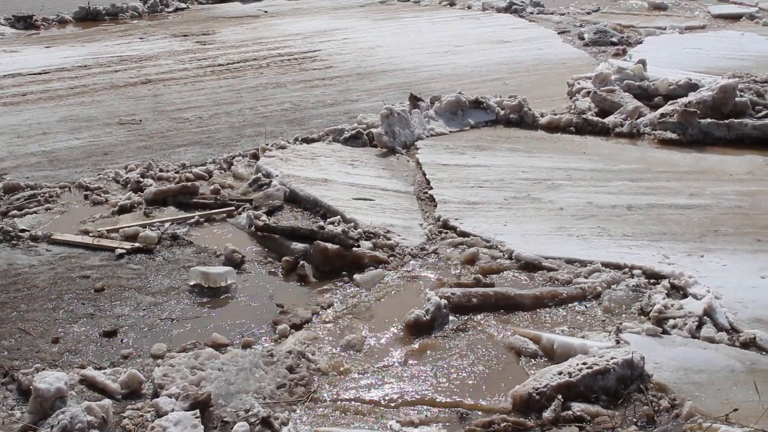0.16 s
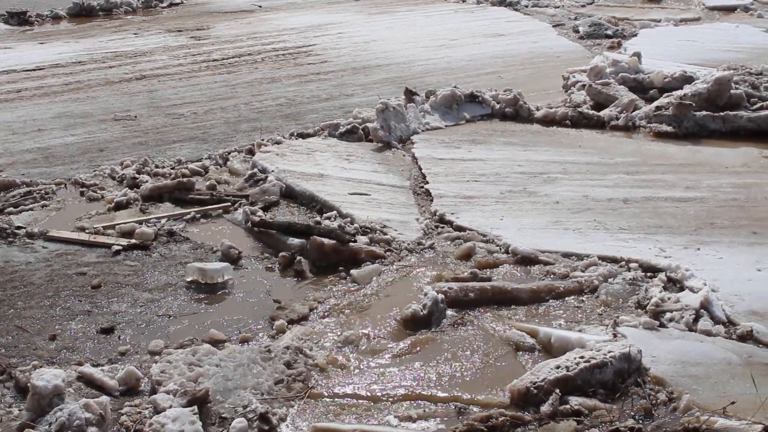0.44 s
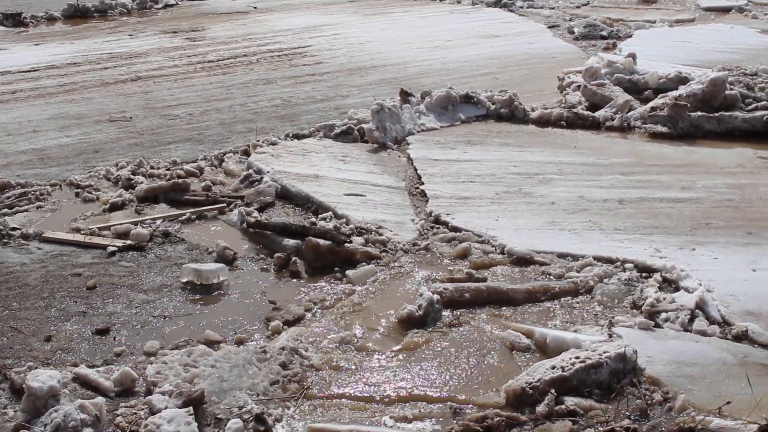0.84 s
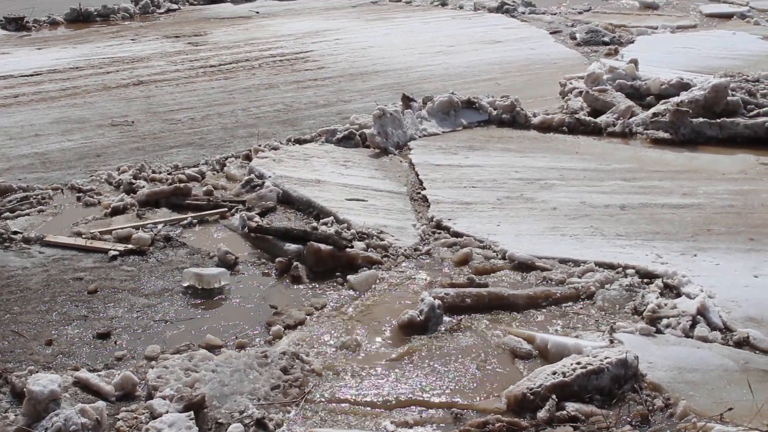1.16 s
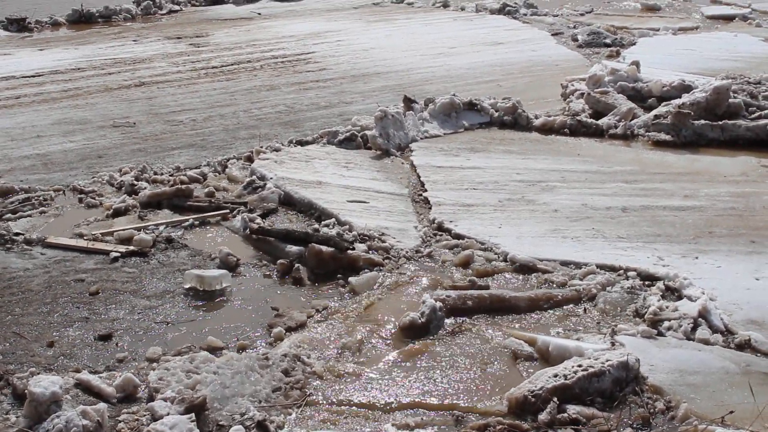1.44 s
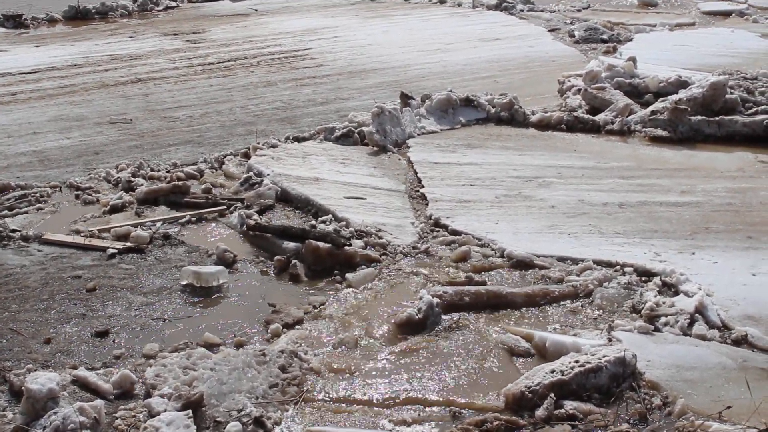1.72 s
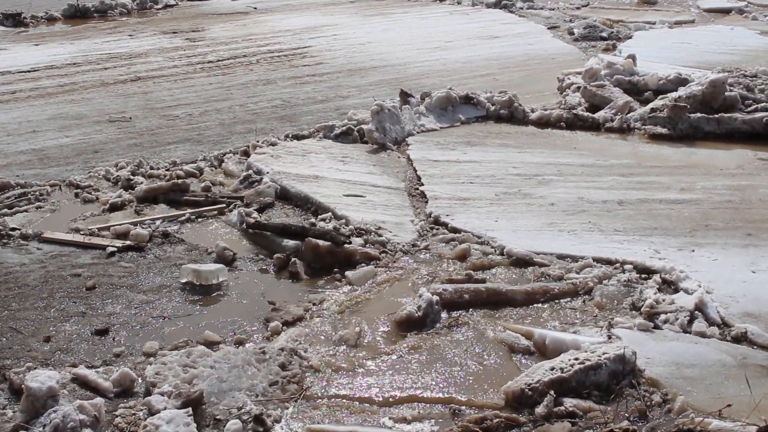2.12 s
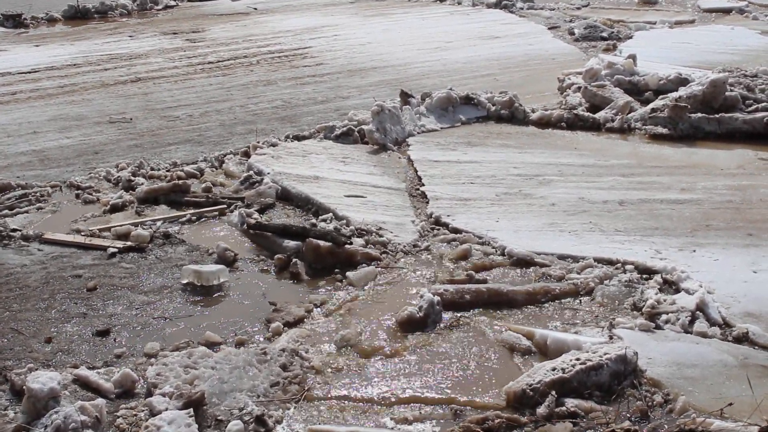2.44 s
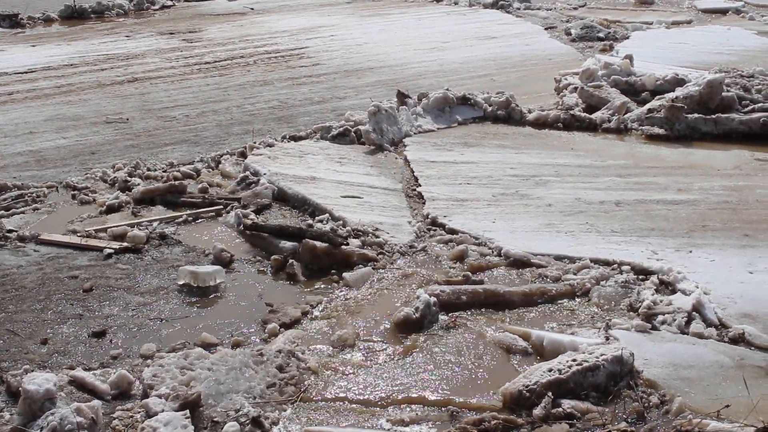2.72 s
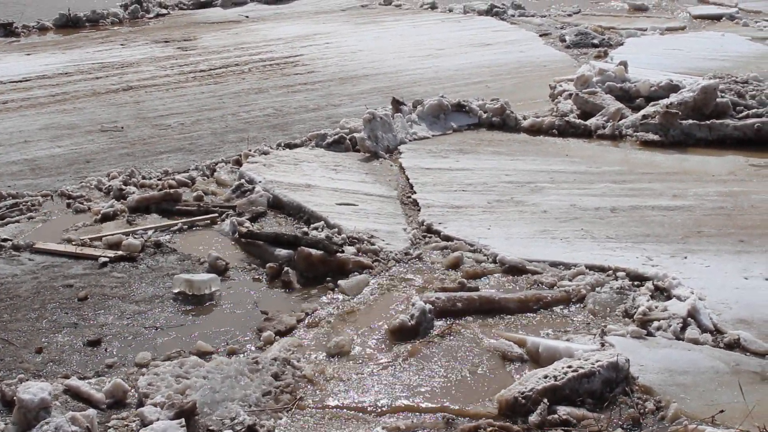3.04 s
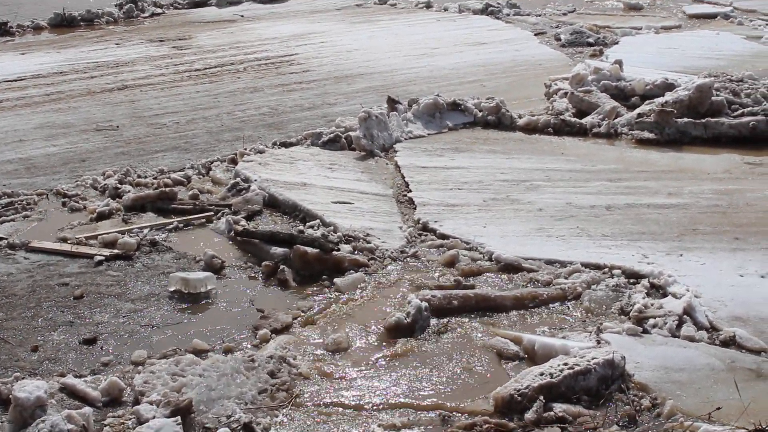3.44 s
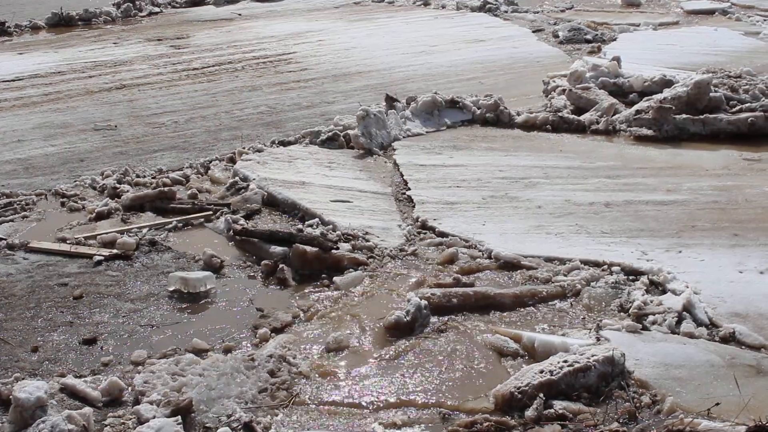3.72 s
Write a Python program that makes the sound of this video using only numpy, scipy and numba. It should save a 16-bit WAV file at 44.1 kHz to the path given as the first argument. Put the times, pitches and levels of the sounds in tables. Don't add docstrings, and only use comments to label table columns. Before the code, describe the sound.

Strong gusty wind thumps and flutters on a small stereo camera microphone throughout, clipping at the hardest hits; behind it a river faintly gurgles past ice slabs outdoors, with small bubble plinks and dry ice ticks.

```python
import sys
import numpy as np
from scipy import signal
from scipy.fft import rfft, irfft, next_fast_len
from scipy.io import wavfile
from scipy.ndimage import uniform_filter1d
from numba import njit

SR = 44100
rng = np.random.default_rng(int(sys.argv[2]) if len(sys.argv) > 2 else 0)


def nominal_scale(level):
    x = np.asarray(level, float) / 20
    return 10 ** x


def master_out(mix):
    frames = np.transpose(np.atleast_2d(mix))
    ceiling = np.clip(frames, -1, 1)
    pcm = np.round(ceiling * 32767).astype(np.int16)
    wavfile.write(sys.argv[1], SR, pcm)


N = 170667
T = np.arange(N) / SR

# frequency in Hz, level in dB per Hz.
RUSH_SPECTRUM = [
    (290, 2.5),
    (500, 2),
    (657, 0.5),
    (1560, -4.5),
    (1990, -5),
    (2400, -6.5),
    (3650, -12),
    (10100, -25),
    (15600, -38),
]
# frequency in Hz, shared part from 0 to 1.
LIKENESS = [
    (1400, 0.88),
    (3100, 0.54),
    (6800, 0.33),
    (15000, 0.11),
]
# time in seconds, gain in dB.
RIVER_GAIN = [(0, -45), (.15, -46), (.42, -46.5), (.5, -49), (.72, -47), (.95, -47), (1.3, -43.5),
              (1.62, -40.5), (1.7, -44), (1.87, -44), (1.884, -50), (2.1, -44.5), (2.3, -45), (2.43, -46.5),
              (2.85, -42), (3.783, -43), (3.794, -52.5), (3.87, -54.5)]
# start in seconds, peak level in dB, pitch in Hz.
PLINKS = [(0.249, -38.5, 1980), (.926, -36.5, 1880), (0.953, -36.5, 3420), (1.027, -37.5, 1145),
          (1.071, -41, 1840), (1.106, -40, 2540), (1.274, -30, 2570), (1.318, -34.5, 1740),
          (1.339, -34.5, 3940), (1.398, -34, 2530), (1.729, -39, 2010), (1.813, -39.5, 4300),
          (1.951, -42, 3270), (2.047, -47, 5740), (2.311, -34.5, 1785), (2.371, -40.5, 3370),
          (3.166, -35.5, 1180), (3.450, -35, 1790), (3.727, -44, 3770)]
# start in seconds, level
# in dB, centre frequency in Hz.
TICKS_AND_FLUTTERS = [(0.097, -49.5, 8550), (.951, -52.5, 7260), (1.095, -56, 9000), (1.246, -49.5, 7940),
                      (1.34, -34.5, 5260), (1.783, -50, 7600), (1.804, -41, 6400), (1.812, -48, 6500),
                      (2.048, -53, 9000), (2.067, -52, 8150), (2.233, -46.5, 6360), (2.546, -48.5, 5960),
                      (2.578, -49.5, 9500), (2.672, -54, 9800), (2.98, -47, 8900), (3.332, -41.5, 4760),
                      (3.501, -44, 5970), (3.789, -50, 9900), (3.850, -48.5, 3700), (.018, -28, 360),
                      (1.726, -24.5, 473), (1.850, -20, 454), (1.049, -57, 9450), (1.187, -52, 8200),
                      (1.381, -50, 6500), (1.857, -49, 4260), (1.865, -59, 9500), (2.014, -51, 7000),
                      (2.021, -38, 3260), (2.985, -44, 4600), (3.152, -50, 8400), (3.779, -45.5, 5500)]
# time in seconds, level in dB, eddy pitch in Hz.
GUST_LEFT = [(0, -23, 113), (.25, -23, 112), (.6, -15.5, 135), (1.0, -18.5, 127), (1.15, -27, 104),
             (1.3, -20, 108), (1.55, -25, 94), (1.68, -17, 106), (1.88, -20, 112), (1.97, -21, 111),
             (2.18, -26, 98), (2.45, -25, 87), (2.62, -21.5, 92), (3.05, -20, 107), (3.32, -27, 105),
             (3.58, -16.5, 110), (3.8, -25, 118), (3.87, -42, 124)]
# time in seconds, level in dB, eddy pitch in Hz.
GUST_RIGHT = [(0, -40, 123), (.11, -23.5, 124), (.5, -17, 180), (.85, -18, 160), (1.15, -23.5, 120),
              (1.35, -17, 143), (1.62, -25, 97), (1.68, -16.5, 146), (1.85, -15, 122), (1.97, -16, 167),
              (2.03, -23, 114), (2.3, -18.5, 101.5), (2.65, -27, 107), (3.08, -19, 126), (3.15, -34, 118),
              (3.5, -31, 107), (3.59, -15.5, 144), (3.87, -19.5, 122)]
# time in seconds, peak level in dB, width in ms.
EDDIES_LEFT = [(0.0299, -10.6, 2.4), (0.0386, -6.7, 2.4), (0.1018, -7.9, 2.8), (0.2494, -9.2, 2.2),
               (0.298, -10.5, 2.2), (0.363, -10.8, 1.8), (0.392, -6.2, 1.8), (0.5302, -4.4, 2.0),
               (0.5986, -4.2, 1.2), (0.6092, -9.7, 1.4), (0.6843, -3.6, 1.4), (0.7274, -8.9, 1.6),
               (0.767, -9.2, 1.8), (0.7851, -10.1, 1.6), (0.79, -6.8, 2.0), (0.8372, -7.5, 2.0),
               (0.989, -9.2, 1.8), (0.9945, -4.8, 2.0), (1.007, -7.8, 1.4), (1.0384, -7.8, 2.4),
               (1.1595, -11.9, 2.2), (1.1697, -9.0, 2.8), (1.2845, -5.4, 3.2), (1.3047, -5.4, 2.0),
               (1.3237, -5.9, 2.2), (1.3649, -7.7, 1.4), (1.6704, -6.1, 1.8), (1.6766, -1.1, 2.6),
               (1.7582, -2.4, 2.8), (1.8057, -7.9, 2.6), (1.8503, -7.5, 2.8), (1.8612, -8.8, 2.0),
               (1.8668, -3.7, 2.2), (1.8728, -8.0, 1.8), (1.9258, -10.1, 2.0), (2.0851, -8.4, 2.2),
               (2.0985, -7.4, 3.0), (2.1758, -2.6, 3.2), (2.3898, -11.5, 3.2), (2.5743, -8.7, 2.8),
               (2.6202, -6.7, 2.4), (2.6273, -3.6, 2.6), (2.65, -3.4, 3.0), (2.7521, -9.1, 2.4),
               (2.767, -6.7, 2.0), (2.8952, -10.3, 2.4), (3.0554, -9.8, 2.6), (3.3901, -6.6, 3.2),
               (3.4803, -9.5, 3.2), (3.5742, -3.3, 1.8), (3.5855, -3.5, 2.0), (3.6495, -6.9, 2.0),
               (3.666, -7.6, 1.6), (3.6824, -2.2, 3.2), (3.7156, -4.5, 2.4), (3.7261, -6.2, 3.0),
               (3.7785, -6.3, 2.4), (3.7898, 0.8, 2.6), (3.8121, -4.3, 2.4), (3.8349, -1.8, 1.8)]
# time in seconds, peak level in dB, width in ms.
EDDIES_RIGHT = [(0.1018, -3.8, 1.4), (0.1234, -7.6, 2.2), (0.1435, -7.6, 1.2), (0.2618, -7.1, 1.6),
                (0.289, -4.6, 2.2), (0.3287, -8.3, 1.4), (0.3521, -6.6, 1.8), (0.4183, -4.0, 1.8),
                (0.435, -4.6, 1.4), (0.4542, -3.4, 1.6), (0.5114, -0.0, 1.4), (0.5243, -7.8, 1.2),
                (0.5682, -6.8, 1.8), (0.5763, -7.6, 1.6), (0.6404, -4.4, 2.2), (0.659, -7.0, 1.8),
                (0.7075, -7.4, 1.6), (0.7576, -7.7, 1.6), (0.777, -6.5, 2.2), (0.8073, -5.7, 2.2),
                (0.8542, -7.8, 2.0), (0.9997, -10.8, 1.2), (1.0494, -7.0, 1.6), (1.0572, -10.2, 1.4),
                (1.1927, -6.9, 2.4), (1.2201, -9.7, 1.8), (1.2936, -9.1, 1.8), (1.3047, -5.6, 2.0),
                (1.411, -9.2, 1.2), (1.4237, -8.4, 1.2), (1.6746, -3.4, 1.6), (1.7226, -3.1, 2.0),
                (1.7575, -2.1, 2.2), (1.8144, -4.1, 2.4), (1.8493, -4.5, 2.6), (1.8656, -3.6, 3.2),
                (1.8765, -0.3, 1.6), (1.9151, -5.2, 1.8), (1.92, -1.7, 1.6), (1.9274, -5.6, 1.4),
                (1.9831, -5.8, 1.2), (2.1849, -8.3, 2.4), (2.2117, -4.5, 2.6), (2.2177, -8.2, 1.8),
                (2.2266, -7.0, 1.8), (2.3057, -5.7, 2.4), (2.3205, -4.1, 2.6), (2.3383, -2.1, 2.6),
                (2.3521, -4.7, 2.4), (2.3918, -6.9, 2.6), (2.5248, -7.9, 2.0), (2.5377, -5.9, 2.4),
                (2.7681, -5.4, 2.6), (2.8749, -10.5, 3.0), (2.9885, -8.3, 1.8), (3.0703, -8.2, 2.4),
                (3.0968, -6.7, 2.6), (3.5828, -4.7, 1.4), (3.5869, -8.4, 1.4), (3.6002, -6.7, 1.4)]

RUSH_DB, LAPPING_DB, RIVER_PAN_DB = -4.5, -12.5, 1.2
LAPPING_HZ, LAPPING_WIDTH_HZ, LAPPING_FLICKER_DB = 1880, 450, 4.5
BUBBLES_PER_S, BUBBLE_DB, BUBBLE_CYCLES, BUBBLE_RISE = 1900, -4.5, 15, 0.2
PLINK_CYCLES, PLINK_RISE = 60, 0.053
TICK_T60_S, TICK_WIDTH, TICK_RISE_S = 0.015, 0.45, 0.00046
EDDIES_PER_S, EDDY_SCATTER_DB, PITCH_SPREAD, SUCTION_SHARE = 480, 3, 0.43, 0.6
BIGGEST = 0.05
BURST_HZ, BURST_DB, SMALL_EDDIES_DB = 10, 3, -0.5
FLURRY_S, FLURRY_DB, FLURRY_PITCH = 0.0067, 7, 0.33
WAKE_S, WAKE_DB = 0.0041, -12.5
CORE_SHARE, CORE_WIDTH = 0.097, 0.51
LEAK, WIND_CUT_HZ = 0.4, 61


def level(x, db):
    return x * nominal_scale(db) / np.sqrt(np.mean(x ** 2))


def read(table, hz):
    table = np.array(table, float)
    return np.interp(np.log(hz), np.log(table[:, 0]), table[:, 1])


def walk(rate_hz):
    period = int(SR / rate_hz)
    steps = np.repeat(rng.standard_normal(N // period + 1), period)
    wander = uniform_filter1d(uniform_filter1d(steps, period), period)[:N]
    return wander / np.std(wander)


def hiss(n, hz, width_hz, channels=1):
    size = next_fast_len(n)
    real, imaginary = rng.standard_normal((2, channels, size // 2 + 1))
    freq = np.arange(size // 2 + 1) * SR / size
    bell = np.exp(-0.5 * ((freq - hz) / width_hz) ** 2)
    return irfft((real + 1j * imaginary) * bell, size)[:, :n]


def ring_decay(hz, cycles):
    return np.exp(-np.log(1000) * hz / (cycles * SR))


@njit
def rings(n, at, size, turn, decay, rise):
    out = np.zeros((2, n))
    for e in range(len(at)):
        loud, step, phase, i = 1., turn[e], 0., int(at[e])
        while loud > .003 and i < n:
            v = loud * np.sin(phase) * min(phase / 9, 1.)
            out[0, i] += size[e, 0] * v
            out[1, i] += size[e, 1] * v
            phase += step
            step += rise * turn[e] * (1 - decay[e])
            loud *= decay[e]
            i += 1
    return out


def rush():
    out, surge, spray = 0, walk(5.9), walk(24.004)
    for hz in 252 * 2 ** (np.arange(19) / 3):
        like = np.clip(read(LIKENESS, hz), 0, 1)
        mid, side = hiss(N, hz, hz / 8, channels=2)
        db = read(RUSH_SPECTRUM, hz) + 0.21 * surge + 1.52 * spray + 0.21 * walk(19)
        opposite = side * np.array([[1], [-1]])
        out = out + nominal_scale(db) * (np.sqrt(1 + like) * mid + np.sqrt(1 - like) * opposite)
    lapping = hiss(N, LAPPING_HZ, LAPPING_WIDTH_HZ / 2) * nominal_scale(LAPPING_FLICKER_DB * walk(45.15))
    return level(out, RUSH_DB) + level(lapping, LAPPING_DB)


def bubbles():
    when, pitch, strength, place = rng.random((4, int(BUBBLES_PER_S * N / SR)))
    hz = 600 * (13000 / 600) ** pitch
    db = read(RUSH_SPECTRUM, hz) + 10 * np.log10(hz) - 2.64 * np.log(strength + 0.02)
    pan_db = 9 * (place - 0.5)
    size = nominal_scale(db[:, None] + np.array([pan_db, -pan_db]).T)
    decay = ring_decay(hz, 2 * BUBBLE_CYCLES)
    return level(rings(N, when * N, size, 2 * np.pi * hz / SR, decay, BUBBLE_RISE), BUBBLE_DB)


def plinks():
    s, db, hz = np.array(PLINKS, float).T
    size = np.outer(nominal_scale(db), np.ones(2))
    return rings(N, s * SR, size, 2 * np.pi * hz / SR, ring_decay(hz, PLINK_CYCLES), PLINK_RISE)


def ticks():
    out, age = np.zeros(N + 2048), np.arange(2048) / SR
    for s, db, hz in TICKS_AND_FLUTTERS:
        burst = level(hiss(2048, hz, TICK_WIDTH * hz / 2)[0], db)
        fade = np.exp(-np.log(1000) * age / max(TICK_T60_S, 14 / hz))
        build = 1 - np.exp(-age / max(TICK_RISE_S, 0.98 / hz))
        out[int(s * SR):][:2048] += burst * fade * build
    return out[:N]


@njit
def thumps(n, at, size, spread):
    out = np.zeros(n)
    for e in range(len(at)):
        first = max(int(at[e] - 5 * spread[e]), 0)
        last = min(int(at[e] + 5 * spread[e]), n)
        for i in range(first, last):
            u = ((i - at[e]) / spread[e]) ** 2
            out[i] -= size[e] * (1 - u) * np.exp(-u / 2)
    return out


def eddies(s, size, spread):
    broad = thumps(N, s * SR, size, spread)
    core = thumps(N, s * SR, size, CORE_WIDTH * spread)
    return (1 - CORE_SHARE) * broad + CORE_SHARE * core


def nearness(s, centres, span_s):
    return np.exp(-0.5 * ((s[:, None] - centres) / span_s) ** 2).max(axis=1)


def wind(gust, big, all_big_s):
    gust_s, gust_db, gust_hz = np.array(gust, float).T
    big_s, big_db, big_ms = np.array(big, float).T
    when, pitch_a, pitch_b, strength, sign = rng.random((5, int(EDDIES_PER_S * N / SR)))
    s = when * T[-1]
    flurry = nearness(s, big_s, FLURRY_S)
    scatter = PITCH_SPREAD * (pitch_a + pitch_b - 1) * 2.29
    hz = np.interp(s, gust_s, gust_hz) * np.exp(scatter + FLURRY_PITCH * (flurry - 0.5))
    db = WAKE_DB * nearness(s, all_big_s, WAKE_S) + FLURRY_DB * flurry
    db = db - EDDY_SCATTER_DB * np.log(strength + BIGGEST)
    size = nominal_scale(db) * np.where(sign < SUCTION_SHARE, 1., -1.)
    crowd = eddies(s, size, SR / (np.sqrt(2) * np.pi * hz))
    crowd = level(crowd * nominal_scale(BURST_DB * np.tanh(walk(BURST_HZ))), SMALL_EDDIES_DB)
    large = eddies(big_s, nominal_scale(big_db), 0.76 * big_ms * SR / 1000)
    return crowd * nominal_scale(np.interp(T, gust_s, gust_db)) + large


def scene():
    gain_s, gain_db = np.array(RIVER_GAIN, float).T
    water = (rush() + bubbles()) * nominal_scale(np.interp(T, gain_s, gain_db))
    river = (water + plinks() + ticks()) * nominal_scale(np.array([[0.5], [-0.5]]) * RIVER_PAN_DB)
    all_big_s = np.array(EDDIES_LEFT + EDDIES_RIGHT)[:, 0]
    left = wind(GUST_LEFT, EDDIES_LEFT, all_big_s)
    right = wind(GUST_RIGHT, EDDIES_RIGHT, all_big_s)
    return river + np.array([left - LEAK * right, right - LEAK * left])


def low_pass(x):
    return signal.sosfilt(signal.butter(12, 15780, fs=SR, output="sos"), x)


def record(dry):
    size = next_fast_len(N)
    f = np.arange(size // 2 + 1) * SR / size
    wind_filter = f ** 1.5286 / np.sqrt(f ** 3 + WIND_CUT_HZ ** 3)
    thin = irfft(rfft(dry, size) * wind_filter, size)[:, :N]
    return low_pass(np.clip(thin, -1, 1))


dry = scene()
out = record(dry)
master_out(out)
```